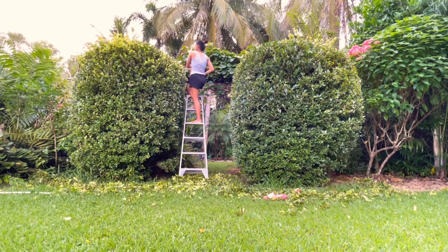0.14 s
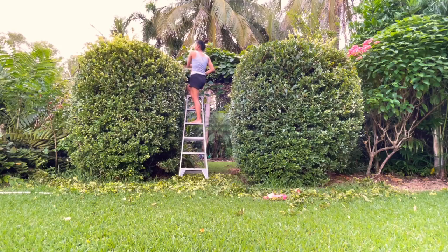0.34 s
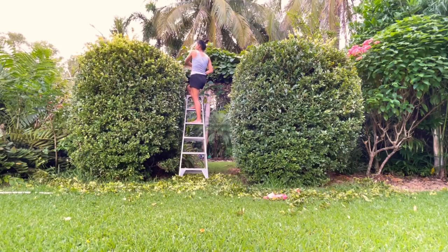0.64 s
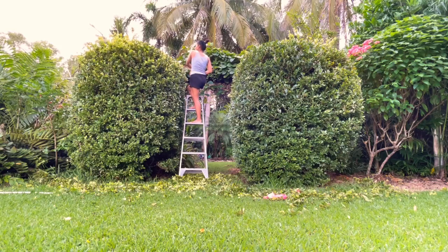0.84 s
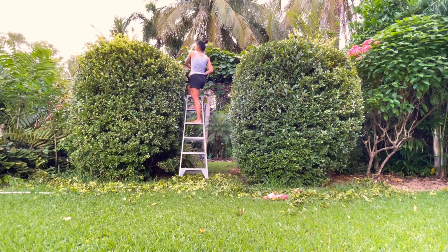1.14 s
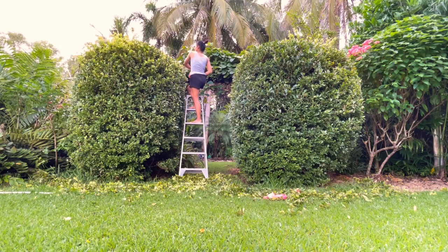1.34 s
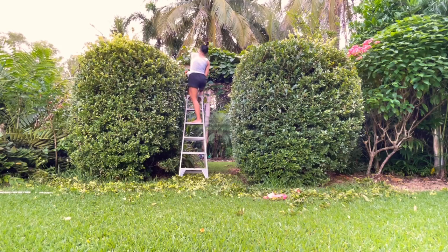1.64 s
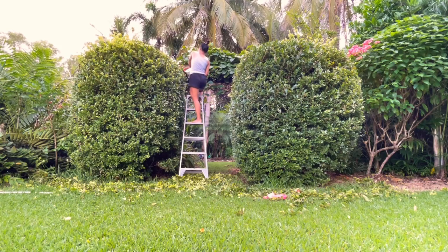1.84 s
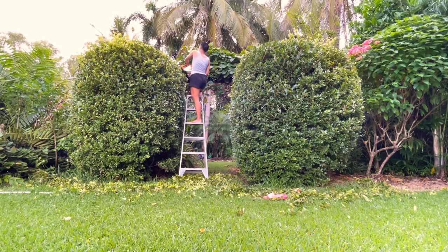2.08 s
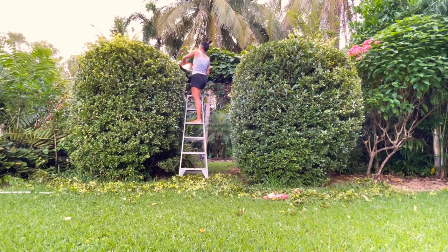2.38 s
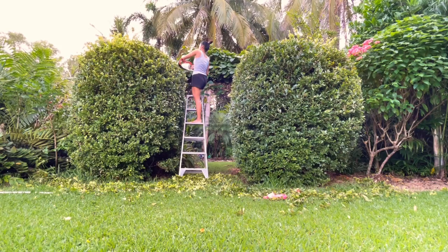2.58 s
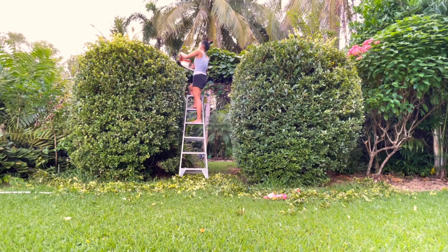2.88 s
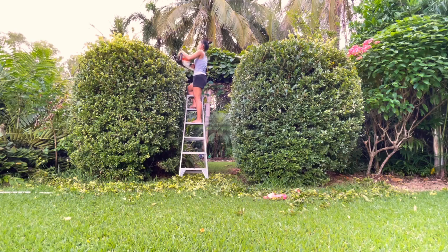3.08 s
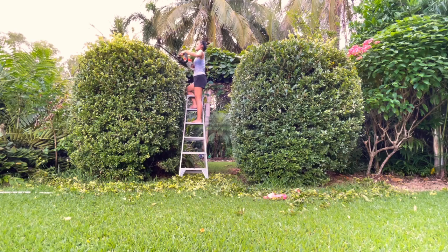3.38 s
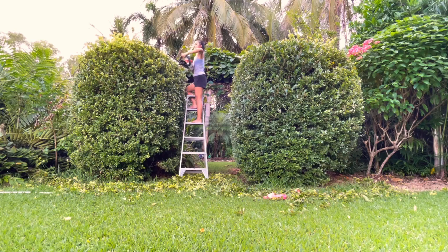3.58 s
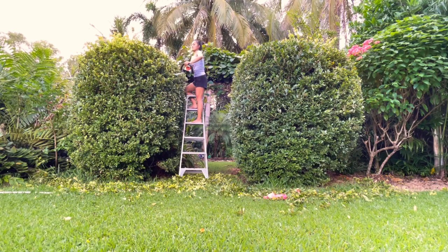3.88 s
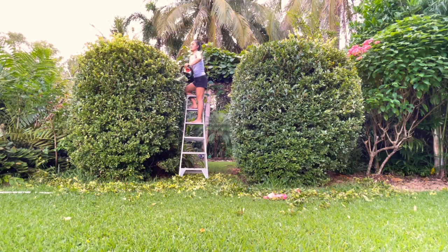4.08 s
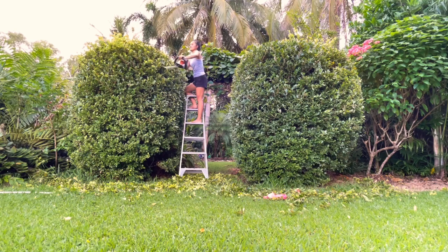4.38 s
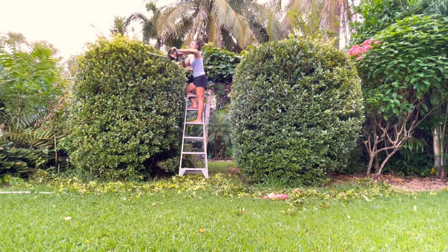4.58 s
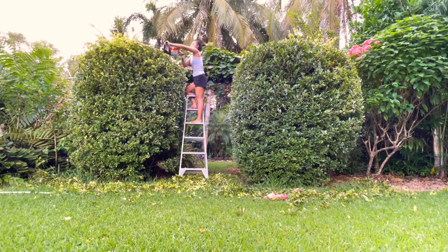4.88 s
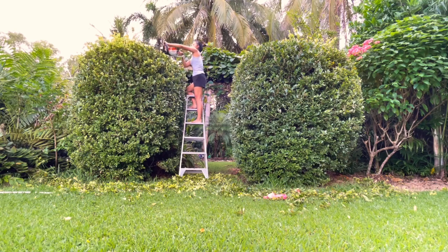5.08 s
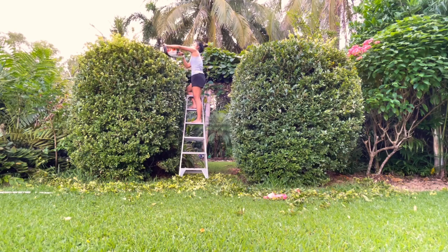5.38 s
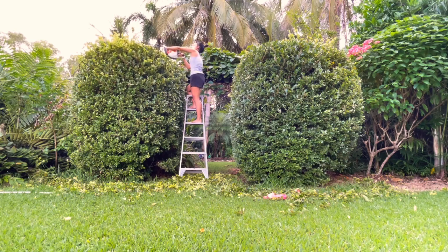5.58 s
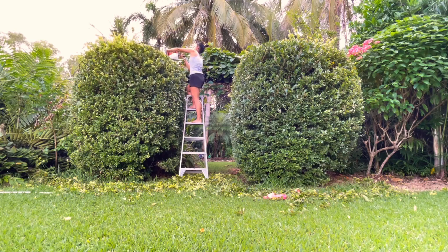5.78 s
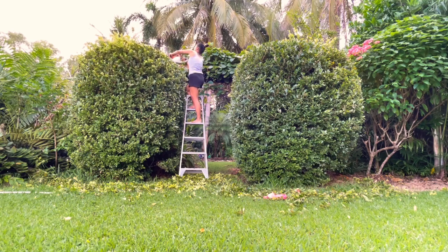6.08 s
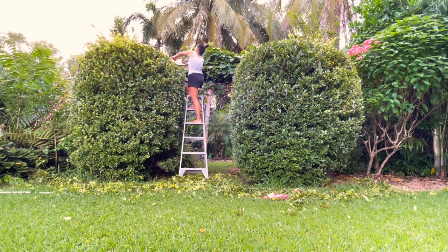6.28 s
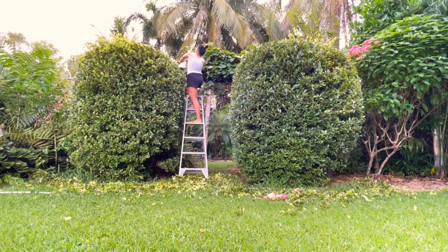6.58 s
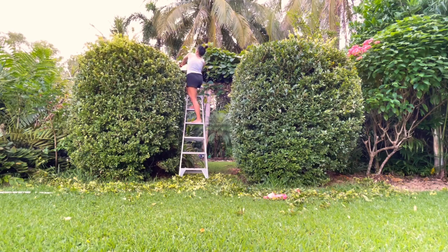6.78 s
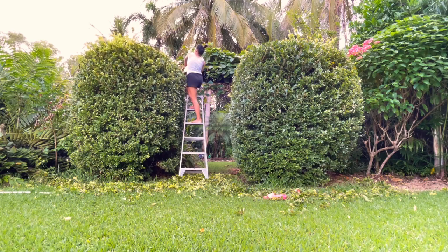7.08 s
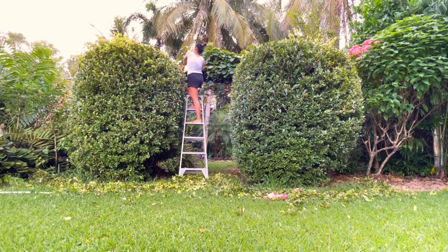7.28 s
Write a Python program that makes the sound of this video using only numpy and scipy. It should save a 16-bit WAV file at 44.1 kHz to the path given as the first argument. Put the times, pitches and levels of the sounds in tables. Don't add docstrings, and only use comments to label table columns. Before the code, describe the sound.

For the first 1.3 seconds the garden is quiet: low distant traffic, soft leaf and insect hiss with a faint cricket, irregular dry twig and ladder ticks, and a soft dove cooing, clearest near 0.85. A far bird gives a falling call around 1.2. At 1.34 a hedge trimmer starts, everything cuts out briefly at 1.43, and it fades in by 1.6. Blades clatter rapidly, about 47 strokes or 94 clashes a second, over bright motor hiss, low hum and whine, with a shifting hollow lawn echo. Twigs crackle near 3.0 to 3.3. Released at 3.4, it runs down quickly; small clicks and a ringing latch snap come around 3.8. It restarts at 3.93, spitting bright crackles from 4.25 to 5.15, then sags slightly in pitch several times between 5 and 7 as thick twigs load it, running until the end near 7.4.

```python
import sys
import numpy as np
from scipy import signal
from scipy.fft import rfft, irfft, next_fast_len
from scipy.io import wavfile
from scipy.ndimage import uniform_filter1d

SR = 44100
rng = np.random.default_rng(int(sys.argv[2]) if len(sys.argv) > 2 else 0)


def put_to_file(sound):
    columns = np.atleast_2d(sound).T
    safe = np.clip(columns, -1, 1)
    whole_steps = np.round(safe * 32767)
    wavfile.write(sys.argv[1], SR, whole_steps.astype(np.int16))


def magnitude_from_level(level_db):
    exponent = np.asarray(level_db, float) / 20
    return 10 ** exponent


N = 328089
T = np.arange(N) / SR
SIZE = next_fast_len(N)
HZ = np.fft.rfftfreq(SIZE, 1 / SR)

# frequency in Hz, density in dB per Hz.
RUMBLE = [(26, -56), (34, -17), (40, -21), (52, 0), (85, 2), (120, 3.5), (140, -0.5), (160, -11),
          (250, -12), (330, -22.5), (430, -30.5), (800, -100)]
RUMBLE_DB, EARLY_RUMBLE_DB, SWELL_DB = -48, -0.5, 2
# frequency in Hz, density in dB per Hz.
AIR = [(250, 3), (330, 0), (600, -4.5), (1400, -9), (3000, -9.5), (4800, -9.5), (5200, 2.5), (5900, 2),
       (6600, -9), (8000, -14), (10000, -6), (11700, -12.5), (12600, -22), (13400, -45)]
AIR_DB = -58
LULL_S, LULL_LENGTH_S, LULL_DB = 0.86, 0.12, -4
# frequency in Hz, width in Hz, level in dB, throbs per second.
CRICKET = (9192, 305, -79, 35)
# start in seconds, length in seconds, pitch in Hz, level in dB.
DOVE = [
    (0.2, 0.18, 676, -66),
    (0.596, .11, 618, -61.5),
    (0.849, 0.08, 711, -52.5),
    (.94, 0.085, 680, -64),
    (1.144, 0.17, 615, -65),
]
COO_PEAK, COO_FADE_DB, COO_DROOP = 0.26, -8, 0.023
# start in seconds, length in seconds, first Hz, last Hz, level in dB.
BIRDS = [
    (0.747, .3, 2430, 2600, -68.5),
    (1.191, .245, 3170, 2110, -59.5),
    (1.28, 0.094, 2930, 2800, -64),
]
SMEAR_BY_END, SMEAR_PER_DB, CLEAR_DB = .7, .16, -60
# start in
# seconds, # peak in dB, ring in Hz, 60 dB decay in seconds, fizz in dB.
TICKS = [(0.0, -45.5, 1700, 1.0, -6), (0.065, -27.5, 1460, 0.056, -14), (0.344, -55, 1260, 0.1, -7),
         (0.4377, -48, 1230, 0.065, -5), (0.5118, -38.5, 1850, 0.088, -21), (0.6033, -39, 1940, 0.06, -9.5),
         (0.663, -62, 1040, 0.13, 7.5), (0.7894, -63, 2270, 0.1, -14), (1.042, -34.5, 1280, 0.13, -7),
         (1.1193, -36, 1630, 0.13, -11), (1.2097, -44, 3060, 0.084, -9), (1.2347, -36, 1480, 0.048, -30),
         (1.2785, -45.5, 2820, 0.046, -4), (1.327, -40.5, 1240, 0.3, -46), (3.7349, -62, 1298, 0.1, -14),
         (3.784, -55, 1500, 0.06, -25), (3.8192, -37, 3100, 0.26, -9.5), (3.8573, -43, 706, 0.13, -5),
         (3.906, -36.5, 1490, 0.066, -18)]
LATCH_S, LATCH_DB = 3.8185, -41
# frequency in Hz, level in dB, 60 dB decay in seconds.
LATCH = [(2310, -12, 0.4), (2970, 2, 0.11), (3600, -1, .08), (5200, 2.5, 0.14), (6080, -1.5, 0.17),
         (6800, -3, .1), (8270, -0.5, 0.093), (11300, -3, 0.1)]
# start in seconds, peak in dB.
SNIPS = [(2.0964, -30), (2.9555, -29), (3.158, -27), (3.2623, -24), (3.3056, -26), (3.823, -42),
         (4.252, -20), (4.3398, -23), (4.3852, -25), (4.5414, -25), (4.6352, -29), (4.7534, -22),
         (4.9742, -24), (5.1515, -29)]
SNIP_S, SNIP_DB, SNIP_HZ = 0.021, 2, 8900

# on in seconds, off in seconds, level in dB.
PULLS = [
    (1.335, 2, -8),
    (1.445, 3.385, 0),
    (3.93, 8, 0),
]
FREE_HZ, SPIN_S, SPIN_SHAPE, COAST_S = 407.5, .085, 1.2, .17
GEAR = 69 / 8
# middle in seconds, sag in Hz, length in seconds.
BITES = [
    (2.45, 1.5, .4),
    (5.2, 5, .43),
    (5.6, 2.5, .6),
    (5.92, 6.5, .3),
    (6.15, 3, .3),
    (6.4, 6.5, .45),
    (6.75, 4, .7),
]
# time in seconds, nearness in dB, motor end turned to the camera from 0 to 1.
HOLD = [(1.6, 0, 0.37), (2.0, 0, .1), (2.35, 1, 0.5), (2.65, 2, 0.22), (2.95, 1.5, 0.86), (3.35, 4, 0.35),
        (4.2, 3.5, 0.6), (4.5, 3, 0.42), (4.8, 4, 0.54), (5.2, 1.5, 0.85), (5.6, 0.84, 0.66),
        (6.0, 2.3, 0.6), (6.3, 0.5, 0.16), (6.7, 0.5, 0.24), (7.0, -2.5, 0.5), (7.44, -1, 0.5)]
SWAY_DB, SWAY_HZ = 0.82, 5.3
PARTS = {"blades": (-33, -7.5, 3, 4.5, 123), "housing": (-40.5, 5.5, 4, 12, 200),
         "guard": (-42.5, 7, 4, 11, 137), "hiss": (-39.5, 0.2, 6.5, 7, 143),
         "hum": (-55.5, 12, 35, 13, 300)}
BUILD_DB, BUILD_S = -15.5, 0.11
SCRAPE = 0.61
# frequency in Hz, density in dB per Hz.
BLADES = [(500, -75), (950, -0.5), (1150, 0), (1350, 0.5), (1550, 2.5), (1900, -9), (3000, -53),
          (6000, -39)]
# frequency in Hz, density in dB per Hz.
GUARD = [(1000, -46), (1550, 3), (1750, 3.5), (2050, 11), (2300, -3.5), (3000, -5), (4000, -23),
         (8000, -10), (11500, -19), (13000, -23)]
# frequency in Hz, density in dB per Hz.
HOUSING = [(200, -19), (330, -3.5), (430, -4), (600, -2), (780, -1), (900, -9), (1300, -23.5), (3000, -58)]
# frequency in Hz, density in dB per Hz.
HISS = [(300, -16.5), (1500, 0), (3000, -0.5), (4200, -2.5), (5200, 1.5), (7000, -6.5), (8200, -6),
        (9000, -6.5), (10000, -5.5), (11500, -3), (12300, -11), (13000, -10.5), (13500, -18.5),
        (15700, -24.5)]
MULTIPLES = [4, 12, 16, 18, 37]
# level in dB, blur in Hz.
WHINE = [(8.5, 25), (4.5, 40), (-4.5, 28), (-15, 25), (-18, 30)]
BEAM_DB = 0.33

# time in seconds, second dip in Hz.
DIP = [(0, 950), (1.6, 995), (2.2, 1018), (2.8, 984), (3.3, 980), (4.1, 1028), (4.6, 917), (5.1, 914),
       (5.6, 924), (6.1, 964), (6.6, 974), (7.0, 1040), (7.44, 1020)]
# frequency in Hz, lead of the left in radians.
LEAD = [(0, 0), (170, -.15), (350, .5), (600, .75), (1700, .8), (3000, 2.4), (4500, 3.0), (5400, 3.4),
        (6300, 6.3), (7000, 5.7), (8200, 5.9), (9000, 5.3), (9800, 3.2), (10400, 3.0), (11900, 0),
        (12800, -.3)]
# frequency in Hz, left minus right in dB.
LOUDER = [(60, -2.1), (300, -.5), (1000, 3), (2200, -1), (3300, 2.3), (4400, .6), (5500, 5.5), (6500, 2.5),
          (8100, -4), (9100, 1), (9900, 0)]
# frequency in Hz, likeness from 0 to 1.
NEAR = [(100, .95), (500, .97), (1200, .86), (2500, .78), (4300, .5), (5200, .68), (7000, .5), (8200, .2),
        (9200, .5), (9750, .95), (10400, .95), (11000, .8), (11900, .92), (12600, .6), (13600, 0),
        (14600, .85)]
# frequency in Hz, likeness from 0 to 1.
FAR = [(70, .95), (200, .84), (700, .6), (1500, .1), (2500, .45), (5000, .25), (6500, .6), (8000, .2),
       (9200, .45), (9800, .88), (10400, .88), (11000, .75), (11900, .9), (13000, .3)]


def evened(x):
    return x / np.sqrt(np.mean(x ** 2) + 1e-20)


def read(points, hz):
    f, value = np.transpose(points)
    return np.interp(np.log(hz + 1), np.log(f + 1), value)


def coloured(x, points):
    return evened(irfft(rfft(x, SIZE) * magnitude_from_level(read(points, HZ)), SIZE)[..., :N])


def along(points):
    return np.interp(T, *np.transpose(points))


def wander(hz):
    count = next_fast_len(N // 16 + 2)
    low_pass = 1 / (1 + (np.fft.rfftfreq(count, 16 / SR) / hz) ** 4)
    slow = irfft(rfft(rng.standard_normal(count)) * low_pass, count)
    return np.interp(T, np.arange(count) * 16 / SR, evened(slow))


def fuzzy(hz, blur_hz):
    carrier = np.exp(2j * np.pi * np.cumsum(hz) / SR)
    slow = rng.standard_normal((2, len(hz) // 32 + 2, 2)) @ [1, 1j]
    for _ in range(2):
        slow = signal.lfilter([1], [1, -np.exp(-np.pi * blur_hz * 32 / SR)], slow)
    slow = [np.interp(np.arange(len(hz)) / 32, np.arange(len(z)), z) for z in slow]
    return evened((slow * carrier).real)


def patchy(patchy_db, bins=5, frames=12):
    count = N // 128 + 5
    a, b, c, d, patches = rng.standard_normal((count, 257, 5), dtype=np.float32).T
    patches = uniform_filter1d(patches, size=bins, axis=0)
    patches = evened(uniform_filter1d(patches, size=frames, axis=1))
    z = np.array([a + 1j * b, c + 1j * d]) * magnitude_from_level(patchy_db * patches)
    return signal.istft(z, nperseg=512, noverlap=384)[1][:, :N]


def place(out, start, sound):
    part = out[:, round(start * SR):][:, :sound.shape[1]]
    part += sound[:, :part.shape[1]]


def garden():
    rumble_db = RUMBLE_DB + EARLY_RUMBLE_DB * (T < 1.434) + SWELL_DB * wander(2.7)
    rumble = coloured(rng.standard_normal((2, N)), RUMBLE) * magnitude_from_level(rumble_db)
    air = magnitude_from_level(AIR_DB - 2.5) * coloured(patchy(2.3), AIR) * magnitude_from_level(1.2 * wander(3))
    air *= magnitude_from_level(LULL_DB * np.exp(-((T - LULL_S) / LULL_LENGTH_S) ** 2))
    hz, width, db, rate = CRICKET
    chirr = coloured(rng.standard_normal((2, N)), [(hz - 3 * width, -60), (hz, 0), (hz + 3 * width, -60)])
    cricket = magnitude_from_level(db + 1.6 * wander(3.5)) * chirr * (1 + 1.3 * np.cos(2 * np.pi * rate * T))
    return rumble + air + cricket


def call_shape(length):
    u = np.arange(round(length * SR)) / (length * SR)
    return u, np.minimum(np.minimum(u, 1 - u) * length / 0.024, 1)


def birds():
    out = np.zeros((2, N))
    for start, length, hz, db in DOVE:
        u, edge = call_shape(length)
        coo = fuzzy(hz * (1 - COO_DROOP * u), 34)
        place(out, start, edge * magnitude_from_level(db + COO_FADE_DB * abs(u - COO_PEAK)) * coo)
    for start, length, first_hz, last_hz, db in BIRDS:
        u, edge = call_shape(length)
        hz = first_hz + (last_hz - first_hz) * u
        smear = np.clip(SMEAR_BY_END * u + SMEAR_PER_DB * (CLEAR_DB - db), 0, .95)
        whistle = np.sqrt(1 - smear ** 2) * fuzzy(hz, 70) + smear * fuzzy(hz, 320)
        place(out, start, edge * magnitude_from_level(db) * whistle)
    return out


def ticks():
    out, t = np.zeros((2, N)), np.arange(14000) / SR
    fizz_band = signal.butter(3, [1100, 12000], "band", fs=SR)
    for start, db, hz, t60, fizz_db in TICKS:
        noise = rng.standard_normal((2, 2, len(t)))
        ring = evened(signal.lfilter(*signal.iirpeak(hz, 2.8, SR), noise[0]))
        fizz = magnitude_from_level(fizz_db + 13) * signal.lfilter(*fizz_band, noise[1])
        tail = 0.056 * magnitude_from_level(-60 * t / 0.4)
        shape = (1 - np.exp(-t / 0.00077)) * (magnitude_from_level(-60 * t / max(t60, .01)) + tail)
        place(out, start, magnitude_from_level(db - 12.5) * (ring + fizz) * shape)
    return out


def latch():
    out, t = np.zeros((2, N)), np.arange(9000) / SR
    for hz, db, t60 in LATCH:
        place(out, LATCH_S, magnitude_from_level(LATCH_DB + db - 60 * t / t60) * fuzzy(hz + 0 * t, 160))
    return out


def snips():
    out, t = np.zeros((2, N)), np.arange(2000) / SR
    band = signal.butter(3, [SNIP_HZ, 12500], "band", fs=SR)
    for start, db in SNIPS:
        spit = signal.lfilter(*band, rng.standard_normal((2, len(t))))
        place(out, start, magnitude_from_level(db + SNIP_DB) * spit * np.exp(-t / SNIP_S))
    return out


def throttle():
    latest = np.searchsorted([p[0] for p in PULLS], T, side="right") - 1
    on, off, db = np.transpose(PULLS)[:, latest]
    running = np.maximum(np.minimum(T, off) - on, 0)
    risen = 1 - np.exp(-(running / SPIN_S) ** SPIN_SHAPE)
    return risen + 1e-3, T - off, db + BUILD_DB * np.exp(-running / BUILD_S)


def shaft_hz(risen, since):
    sag = sum(hz * np.maximum(1 - 2 * abs(T - s) / length, 0) for s, hz, length in BITES)
    return (FREE_HZ - sag) * risen * np.exp(-np.maximum(since, 0) / COAST_S)


def part_db(part, risen, since, pull_db):
    db, turned_db, halving_db, lost_db, fall_db = part
    s, near_db, turn = np.transpose(HOLD)
    released = uniform_filter1d(np.where(since > 0, lost_db + fall_db * since, 0), size=600)
    held = np.interp(T, s, near_db + turned_db * turn) + SWAY_DB * wander(SWAY_HZ)
    return db + pull_db + held + halving_db * np.log2(risen) - released


def clashes(strokes, spread_db, fade):
    force = magnitude_from_level(spread_db * np.clip(rng.standard_normal(800), -2, 2))
    blows = force[strokes.astype(int) % 800] * np.exp(-(strokes % 1) / fade)
    return uniform_filter1d(blows, size=50)


def whine(shaft):
    turn = np.interp(T, *np.transpose(HOLD)[::2])
    out = np.zeros((2, N))
    for k, (db, blur_hz) in zip(MULTIPLES, WHINE):
        out += magnitude_from_level(db + BEAM_DB * k * turn) * fuzzy(shaft * k, blur_hz)
    return (shaft / shaft.max()) ** 2 * out


def trimmer():
    risen, since, pull_db = throttle()
    levels = [part_db(part, risen, since, pull_db) for part in PARTS.values()]
    blades_db, housing_db, guard_db, hiss_db, hum_db = levels
    shaft = shaft_hz(risen, since)
    turns = np.cumsum(shaft) / SR
    first, second = np.interp([2.523, 5.551], T, turns)
    strokes = (turns - np.where(T < 3.85, first, second)) / GEAR + 400
    strokes += .015 * wander(30)
    main = clashes(strokes, 1.6, .3)
    back = clashes(strokes + .5, 2.5, .2)
    main += (SCRAPE - main) * (1 - shaft / shaft.max())

    noise = patchy(1.32)
    new_stroke = np.diff(np.floor(strokes), prepend=0) == 1
    knock = 11 * noise.std() * np.roll(main, -25) * new_stroke
    rattle = noise * magnitude_from_level(1.6 * wander(300))
    body = magnitude_from_level(blades_db - 1.5) * coloured(rattle * (.2 + main + .2 * back) + knock, BLADES)
    body += magnitude_from_level(guard_db - 3.5) * coloured(rattle * (0.23 + main + 0.053 * back) + 0.41 * knock, GUARD)
    late = np.roll(main, 90, axis=0)
    body += magnitude_from_level(housing_db - 3.0) * coloured(rattle * (0.65 + late + 0.96 * back), HOUSING)

    puff = 1 + 0.15 * np.cos(2 * np.pi * turns) + 0.15 * (main + back)
    body += magnitude_from_level(hiss_db + 5.5) * coloured(noise * puff * magnitude_from_level(0.16 * wander(22.0)), HISS)
    body += magnitude_from_level(hiss_db - 13.0) * whine(shaft)
    load = 1 + 0.43 * np.cos(2 * np.pi * strokes - 1.2)
    hum = np.sqrt(2) * np.cos(2 * np.pi * turns) * load
    return body + magnitude_from_level(hum_db) * hum


def lawn(pair, echo_db=-4.5, dull_hz=1700):
    delay = 3 / (2 * along(DIP)) - np.sqrt(2) / (2 * np.pi * dull_hz)
    dull = signal.lfilter(*signal.butter(2, dull_hz, fs=SR), pair)
    return pair + magnitude_from_level(echo_db) * np.array([np.interp(T - delay, T, x) for x in dull])


def ports(pair, likeness):
    first, second = rfft(pair, SIZE)
    same = np.clip(read(likeness, HZ), 0, 1)
    lag = np.exp(-1j * np.interp(HZ, *np.transpose(LEAD)))
    right = same * first * lag + np.sqrt(1 - same ** 2) * second
    tilt = magnitude_from_level(read(LOUDER, HZ) / 2)
    return irfft([first * tilt, right / tilt], SIZE)[:, :N]


def scene():
    far = birds() + garden()
    near = lawn(trimmer() + snips() + ticks() + latch())
    return ports(near, NEAR) + ports(far, FAR)


def thinned(x, below_db=9.0, quiet_db=-112):
    z = signal.stft([x[0] + x[1], x[0] - x[1]], nperseg=2048)[2]
    top = z[:, 436:1020].reshape(2, -1, 8, z.shape[2])
    power = (abs(top) ** 2).mean(axis=2)
    treble = power[:, :14].sum(axis=0).mean(axis=0)
    keep = power > treble / magnitude_from_level(2 * below_db) + magnitude_from_level(2 * quiet_db)
    z[:, 436:1020] = (top * keep[:, :, None]).reshape(2, -1, z.shape[2])
    mid, side = signal.istft(z, nperseg=2048)[1][:, :N] / 2
    return np.array([mid + side, mid - side])


def scene_change():
    cut_s, silent_s, fade_in_s = 1.434, .044, .085
    back = np.clip((T - cut_s - silent_s) / fade_in_s, .003, 1)
    return uniform_filter1d(np.where(T < cut_s, 1, back), size=150)


def band_limit(x):
    return signal.sosfilt(signal.butter(12, 15670, fs=SR, output="sos"), x)


def record(dry):
    mix = thinned(dry) * scene_change()
    return band_limit(mix)


dry = scene()
out = record(dry)
put_to_file(out)
```